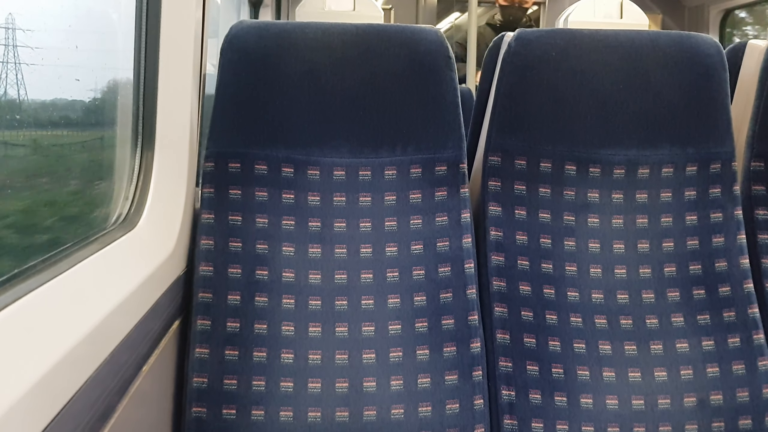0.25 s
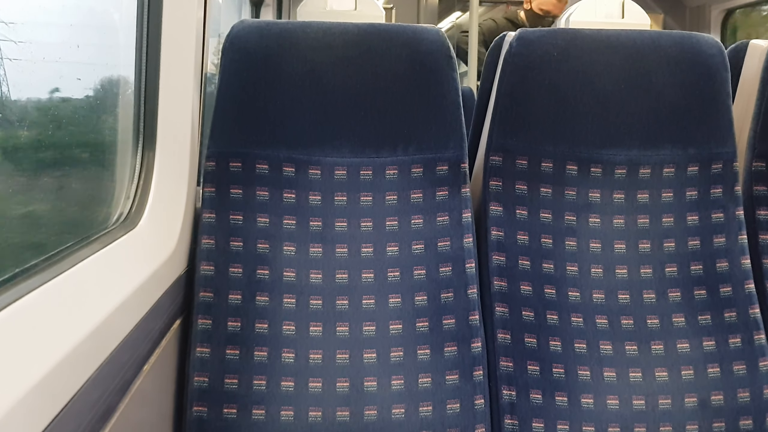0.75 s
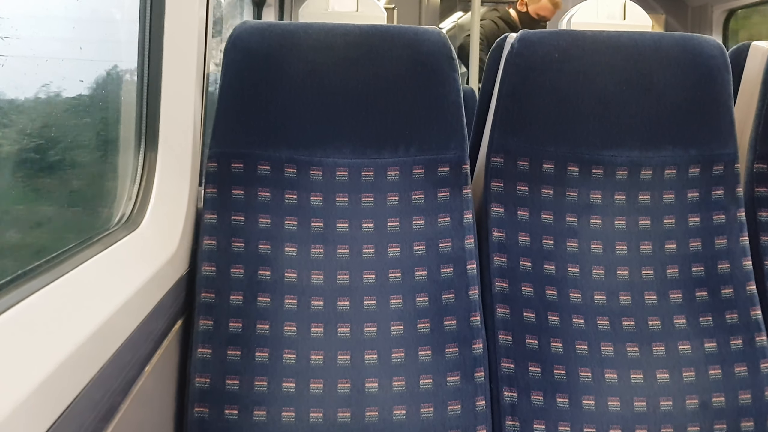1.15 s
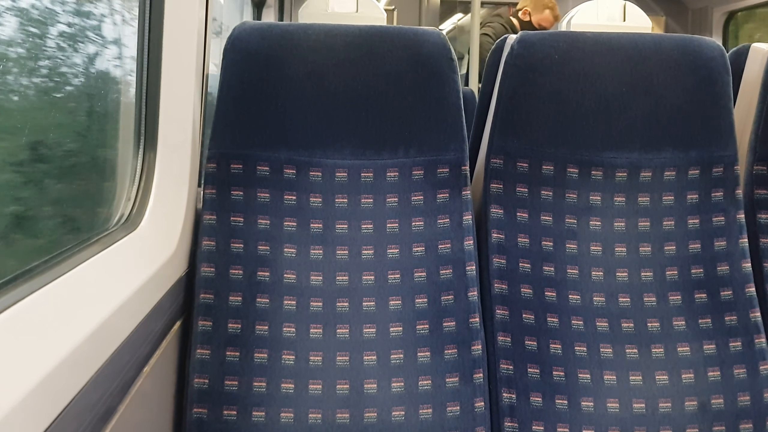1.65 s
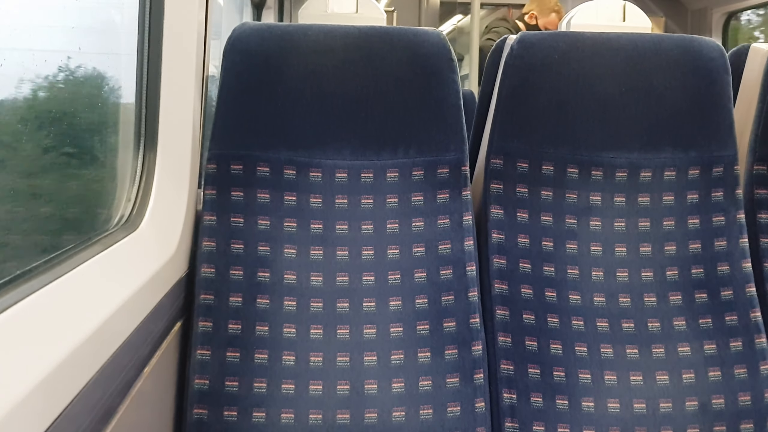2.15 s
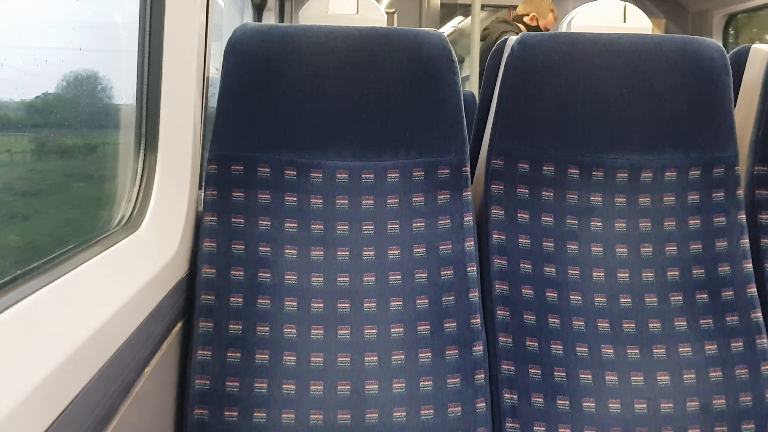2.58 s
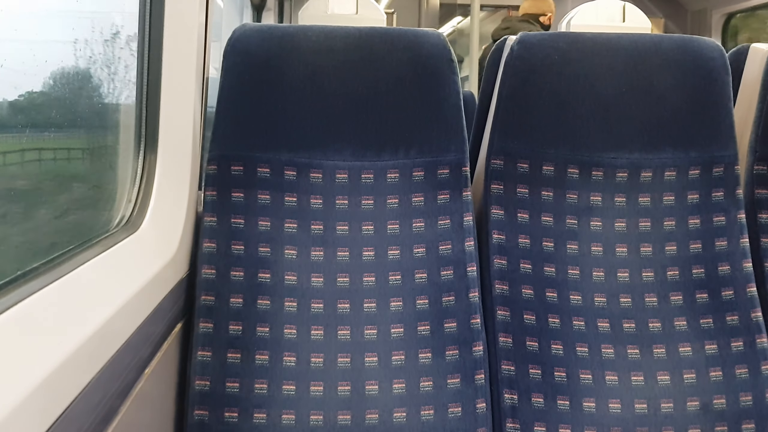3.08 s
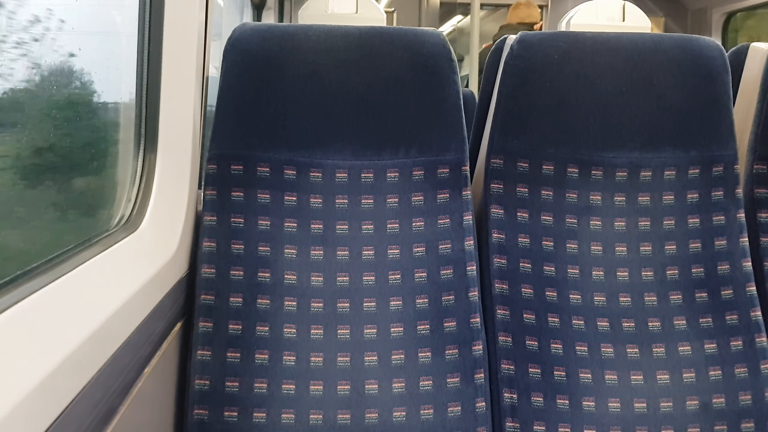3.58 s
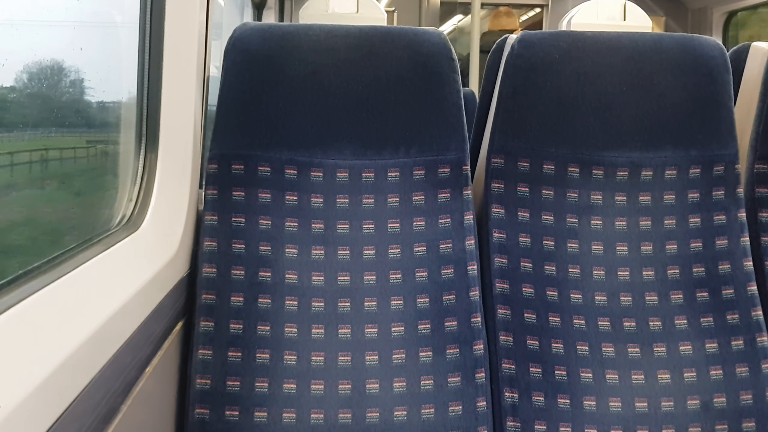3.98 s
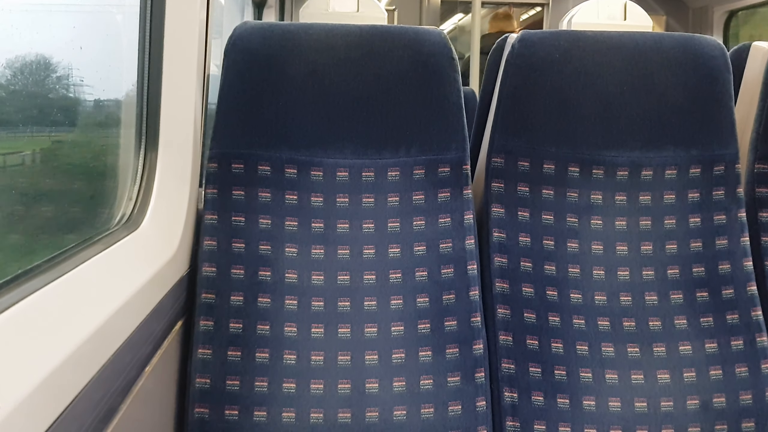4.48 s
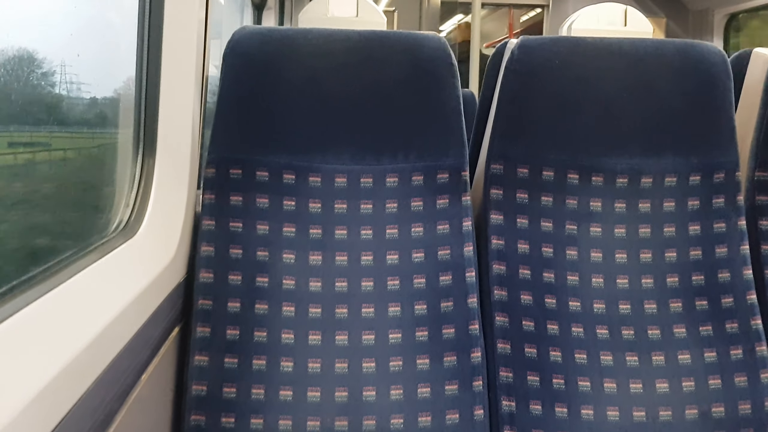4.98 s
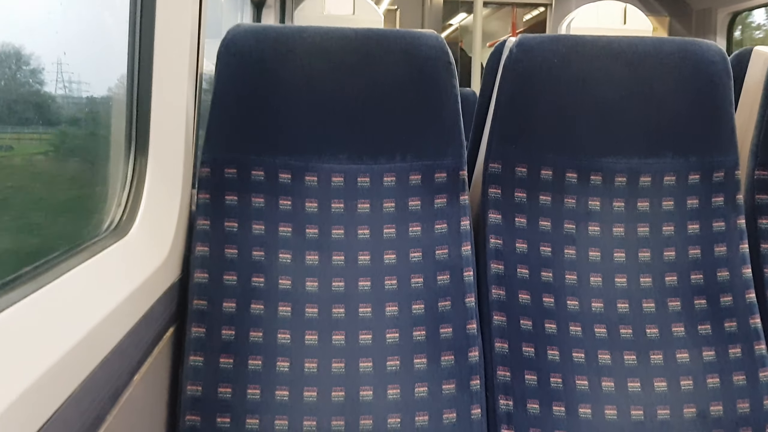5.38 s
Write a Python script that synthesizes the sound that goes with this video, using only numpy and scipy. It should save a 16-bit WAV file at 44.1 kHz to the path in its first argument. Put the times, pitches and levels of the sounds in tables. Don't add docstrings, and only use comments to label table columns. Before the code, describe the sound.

The sound is heard from a seat inside the saloon of a moving diesel passenger train, in a close, damped space. From 0 seconds a heavy low drone fills everything: the underfloor engine throbs evenly, about fifteen quick pulses per second, at constant speed. Around it is a dull, slightly fluctuating roar of wheels on rails, felt through floor and body panels, mostly bass and low mids with soft, faint treble. A second machine and a pump add steady hums, and thin whines waver quietly. A low shaft hum swells a little over the first four seconds and climbs very slightly in pitch throughout. Between about 0.2 and 0.8 seconds clothing brushes almost inaudibly. The drone then continues unbroken until about 5.0 seconds, when cloth rustles close to the microphone: small ticks and snaps, the sharpest near 5.2, a bright swish, then duller slides until the end around 5.6 seconds.

```python
import sys
import numpy as np
from scipy import signal
from scipy.fft import rfft, irfft
from scipy.io import wavfile

SR = 44100
rng = np.random.default_rng(int(sys.argv[2]) if len(sys.argv) > 2 else 0)


def undo_db(level):
    steps = np.asarray(level, float) / 20
    return 10 ** steps


def transcribe(u):
    v = np.clip(np.atleast_2d(u).T, -1, 1)
    q = np.round(v * 32767).astype(np.int16)
    wavfile.write(sys.argv[1], SR, q)


N = 248724
TIME = np.arange(N) / SR
HZ = np.maximum(np.fft.rfftfreq(N, 1 / SR), 1)
SIDES = np.array([[.5], [-.5]])


def at_hz(points, hz):
    points = np.array(points)
    return np.interp(np.log(hz), np.log(points[:, 0]), points[:, 1])


def drift(rate):
    steps = signal.lfilter([1, 2, 1], [np.sqrt(6)], rng.standard_normal(700))
    return np.interp(TIME * rate * 2, np.arange(700), steps)


def scattered(count):
    saloon_t60_s, nearby_share = .16, .5
    span = np.arange(round(saloon_t60_s * SR))
    echoes = rng.standard_normal((count, 2, len(span))) * undo_db(-60 * span / len(span))
    echoes /= np.sqrt(count * np.sum(echoes ** 2, axis=2, keepdims=True))
    nearby = sum(rfft(rng.standard_normal(N)) * rfft(paths, N) for paths in echoes)
    diffuse = rfft(rng.standard_normal((2, N)))
    return np.sqrt(nearby_share) * nearby + np.sqrt(1 - nearby_share) * diffuse


# freq_hz, likeness (1 = same)
SIDE_LIKENESS = [(60, 0.91), (130, 1), (290, 0.76), (640, 0.33), (1410, -0.34), (3100, 0.0098),
                 (6820, -0.53), (15000, -0.89)]


def stereo_noise(density_db, lean_db, count):
    alike = np.clip(at_hz(SIDE_LIKENESS, HZ), 0, 1)
    common = rfft(rng.standard_normal(N))
    pair = np.sqrt(alike) * common + np.sqrt(1 - alike) * scattered(count)
    return irfft(pair * undo_db(density_db + lean_db * SIDES), N) * np.sqrt(SR / 2)


# freq_hz, density_db (per Hz)
BODY_RUMBLE = [(20, -71.5), (32, -56), (43, -67), (58, -51), (72, -50.5), (110, -55), (147, -48),
               (175, -54.5), (210, -57.5), (250, -55.5), (310, -57.5), (380, -61.5), (430, -59.5),
               (500, -68)]
# freq_hz, density_db (per Hz)
WHEEL_ROLLING = [(500, -65), (620, -65.5), (780, -69.5), (1120, -74), (1600, -78.5), (2500, -80),
                 (3000, -86.5), (4000, -92.5), (6600, -98.5), (7700, -108), (8400, -108), (9500, -104),
                 (12000, -103), (15500, -106)]
# freq_hz, width_hz, boost_db
PANEL_RESONANCES = [(900, 30, 4), (940, 60, 9), (1015, 30, 5), (1260, 30, 10), (1308, 8, 8), (1385, 30, 4),
                    (1420, 12, 6), (1465, 14, 9), (1675, 12, 6), (1800, 60, 3), (2400, 40, 3),
                    (4220, 60, 3), (5050, 200, 3), (7460, 60, 4)]
# freq_hz, left_over_right_db
ROAR_LEAN = [(60, 2), (110, 6), (380, 2.5), (700, 1.5), (1290, -0.5), (2380, 1), (3500, 2), (5000, 0.5),
             (5800, -3.5), (6600, -10), (7500, 1), (9000, 1), (12000, -0.5), (15000, 2)]


def running_noise():
    density_db = at_hz([(8, -110)] + BODY_RUMBLE + WHEEL_ROLLING[1:], HZ)
    for hz, width_hz, boost_db in PANEL_RESONANCES:
        density_db += boost_db / (1 + (2 * (HZ - hz) / width_hz) ** 2)
    roar = stereo_noise(density_db, at_hz(ROAR_LEAN, HZ), count=3)
    return roar * undo_db(0.5 * drift(8.8))


def tone(phase, level_db, lean_db, lead_rad):
    return np.sqrt(2) * undo_db(level_db + lean_db * SIDES) * np.cos(phase + lead_rad * SIDES)


# pitch_hz, level_db, left_over_right_db, waver_hz, left_lead_rad
STRAY_WHINES = [(145.4, -41, 2, .1, 0), (207.1, -49, 4, .2, 0), (1419.9, -60, 3, 1.5, .7),
                (1557.6, -56.5, 5, 1.2, 2.2)]


def stray_whines():
    out = 0
    for hz, level_db, lean_db, waver_hz, lead_rad in STRAY_WHINES:
        phase = 2 * np.pi * np.cumsum(hz + waver_hz * drift(3.3)) / SR
        out = out + tone(phase, level_db + 0.45 * drift(3.3), lean_db, lead_rad)
    return out


# time_s, pitch_hz, level_db
SHAFT_RISE = [
    (0, 68.175, -28.8),
    (1.88, 69.284, -26.1),
    (3.76, 70.408, -25.4),
    (5.64, 71.585, -26.4),
]


def drive_shaft():
    time_s, hz, level_db = np.transpose(SHAFT_RISE)
    turning = 2 * np.pi * np.cumsum(np.interp(TIME, time_s, hz)) / SR
    start_rad = -.5
    return tone(start_rad + turning, np.interp(TIME, time_s, level_db), 1.6, .05)


def orders(base_hz, table, phases, unsteady_db, wander_rad):
    turn = 2 * np.pi * base_hz * TIME + wander_rad * drift(.5)
    out = 0
    for k, level_db, lean_db, lead_rad in table:
        level_db += .2 + k * base_hz / 700
        out = out + tone(k * turn + phases[k], level_db + unsteady_db * drift(1.2), lean_db, lead_rad)
    return out


# multiple, level_db, left_over_right_db, left_lead_rad
PUMP_ORDERS = [(1, -55.3, 4, -1.1), (2, -50.3, -2, 0.3), (3, -59.4, -8, 0.5), (4, -63.9, -7, 2.9)]


def gear_pump():
    phases = rng.uniform(0, 2 * np.pi, 80)
    return orders(331.56, PUMP_ORDERS, phases, unsteady_db=1.0, wander_rad=.22)


# multiple, level_db, left_over_right_db, left_lead_rad
AUXILIARY_ORDERS = [(4, -40.8, 0, 0.0), (5, -42.9, 2, 0.0), (8, -40.3, 2, -0.3), (10, -49.2, 6, 0.0),
                    (12, -51.4, 16, 0.6), (14, -45.7, 3, 0.2), (16, -47.6, 5, 0.0), (28, -43.7, 0, 1.0),
                    (42, -57.6, -1, -0.3), (56, -59.8, 6, 1.8), (70, -65.8, -2, 0.1)]


def auxiliary_machine():
    phases = 2 * np.pi * (.375 * np.arange(80) - .14)
    return orders(18.684, AUXILIARY_ORDERS, phases, unsteady_db=.9, wander_rad=.008)


# start_s (of hold), hold_s, level_db, dullness_db
CLOTH_STROKES = [
    (.2, 0.0091, -69, -1),
    (0.456, .1, -72.5, -1),
    (.6, .18, -69.5, 0),
    (5.062, .05, -64, 11.5),
    (5.181, .035, -49.5, 4.5),
    (5.297, .12, -57, 8.5),
    (5.45, .08, -53.5, 5),
]


def sliding(bright, dull):
    rise_db_per_s, fall_db_per_s = 140, 110
    power = np.zeros((2, N))
    for start_s, hold_s, level_db, dull_db in CLOTH_STROKES:
        before_db = np.maximum(rise_db_per_s * (start_s - TIME), 0)
        after_db = np.maximum(fall_db_per_s * (TIME - start_s - hold_s), 0)
        power += undo_db(level_db + np.array([[0], [dull_db]]) - before_db - after_db) ** 2
    grain = np.sqrt(power) * undo_db(np.array([1.5 * drift(60), 1.5 * drift(60)]))
    return grain[0] * bright + grain[1] * dull


# time_s, peak_db
FOLD_SNAPS = [
    (5.0115, -51),
    (5.133, -40),
    (5.152, -42.5),
    (5.1801, -41),
    (5.2039, -33),
    (5.4646, -43),
]


def snapping(bright, dull):
    snaps = np.zeros(N)
    for time_s, peak_db in FOLD_SNAPS:
        snaps[round(time_s * SR)] = undo_db(peak_db - 7)
    decay_s = .0015
    envelope = signal.lfilter([1], [1, -np.exp(-1 / (decay_s * SR))], snaps)
    return envelope * (bright + 0.52 * dull)


# freq_hz, density_db (per Hz)
CLOTH_COLOUR = [(2000, -13.5), (3500, -2.5), (5000, -4.5), (6300, -4.5), (7900, -14), (9600, -3.5),
                (11000, -0.5), (13000, 2), (15500, 0.5)]


def cloth():
    density_db = np.where(HZ > 1500, at_hz(CLOTH_COLOUR, HZ), -80) - 38
    hiss = stereo_noise(density_db, lean_db=2.0, count=2)
    dull = signal.sosfilt(signal.butter(8, 7900, fs=SR, output="sos"), hiss)
    bright = signal.sosfilt(signal.butter(8, 7900, "high", fs=SR, output="sos"), hiss)
    return sliding(bright, dull) + snapping(bright, dull)


ENGINE_CYCLE_HZ = 14.6805
# freq_hz, level_db
FLOOR_PASS = [(44, -52.5), (59, -38.4), (86, -29.6), (150, -26.2), (200, -39.3), (440, -45), (470, -59),
              (970, -72)]
# freq_hz, width_hz, change_db
STANDING_WAVES = [(73, 10, -2.2), (105.5, 20, -24), (191, 8, -6), (250, 10, 3.5), (269.5, 20, -21),
                  (330, 36, -12), (386, 30, -20), (411, 8, 3.5), (426, 10, -4), (521, 26, 10),
                  (568, 26, 13), (640, 30, 9), (705, 10, 9), (915, 80, 12)]
# freq_hz, left_over_right_db, left_lead_rad
ORDER_SEATING = [(60, 1.5, 0), (150, 2.3, 0), (220, 5.5, 0), (255, 3, .5), (295, -1, 0), (410, 6.5, .9),
                 (440, 0, 1), (500, 0, 0)]


def engine_orders():
    k = np.arange(2, 67)
    hz = k * ENGINE_CYCLE_HZ
    place = np.array(ORDER_SEATING)
    level_db = at_hz(FLOOR_PASS, hz)
    for at, width_hz, change_db in STANDING_WAVES:
        level_db = level_db + change_db * np.exp(-(2 * (hz - at) / width_hz) ** 2)
    knock_from_hz, spread_db, spread_lean_db, spread_lead_rad = 460, 1.5, 5, 1.6
    chance = rng.uniform(-1, 1, (len(k), 3)) * (hz > knock_from_hz)[:, None]
    level_db = level_db + spread_db * np.sqrt(3) * chance[:, 0]
    lean_db = at_hz(place, hz) + spread_lean_db * np.sqrt(3) * chance[:, 1]
    lead_rad = at_hz(place[:, ::2], hz) + spread_lead_rad * chance[:, 2]
    return zip(k, level_db, lean_db, lead_rad)


def engine():
    k = np.arange(80)
    lag = np.minimum(.91 * np.exp((8 - k) / 1.6) - .1, .78)
    lag[16:] = .065
    past_floor_mode = -1.5 * np.pi * (k > 12)
    past_floor_mode += np.pi * ((k > 18) & (k < 22))
    scatter = rng.uniform(-np.pi, np.pi, 80) * (k > 31)
    phases = scatter + past_floor_mode - 2 * np.pi * (np.cumsum(lag) - lag) + 1.9
    return orders(ENGINE_CYCLE_HZ, engine_orders(), phases, unsteady_db=.5, wander_rad=.006)


def scene():
    machines = stray_whines() + drive_shaft() + gear_pump() + auxiliary_machine()
    return running_noise() + machines + cloth() + engine()


def low_pass(x):
    return signal.sosfilt(signal.butter(12, 15790, fs=SR, output="sos"), x)


def record(dry):
    mix = dry * np.minimum(TIME / .002, 1)
    return low_pass(mix)


dry = scene()
out = record(dry)
transcribe(out)
```